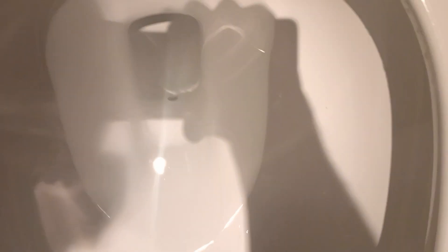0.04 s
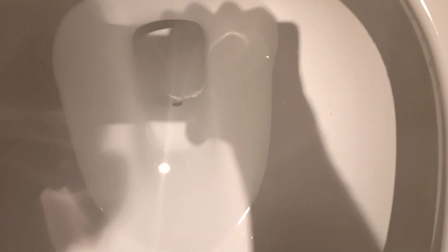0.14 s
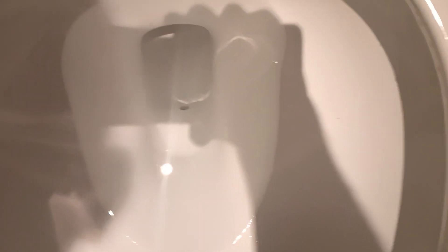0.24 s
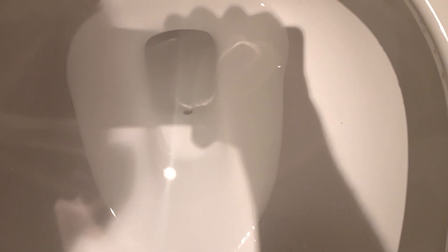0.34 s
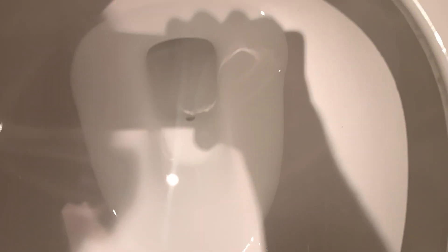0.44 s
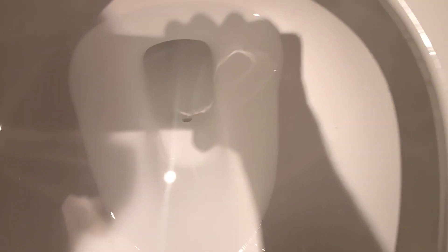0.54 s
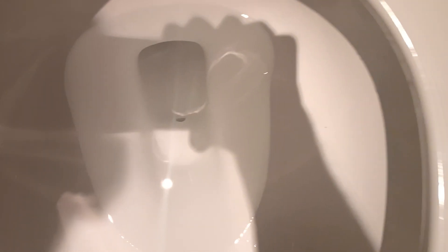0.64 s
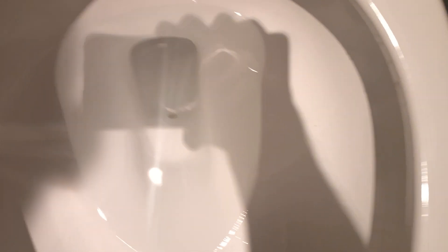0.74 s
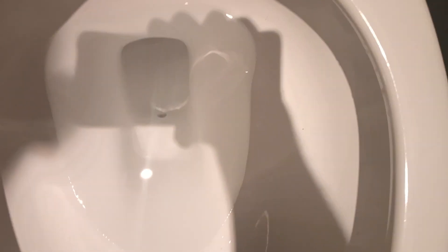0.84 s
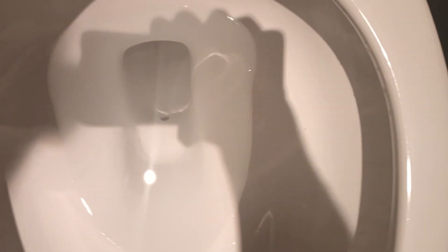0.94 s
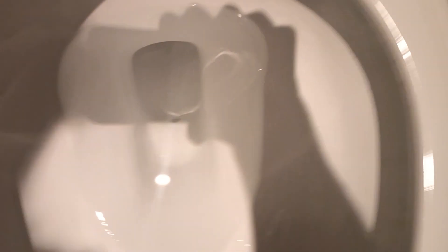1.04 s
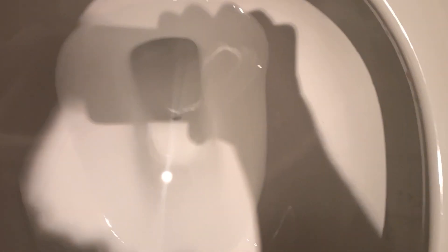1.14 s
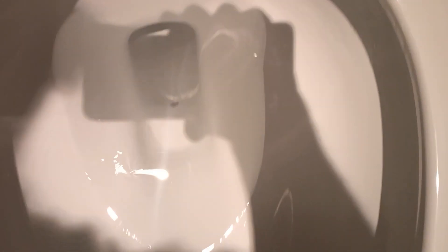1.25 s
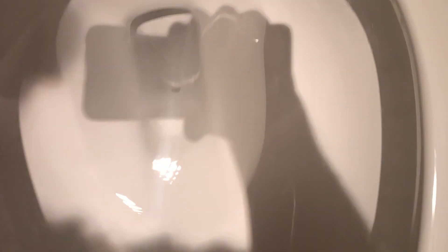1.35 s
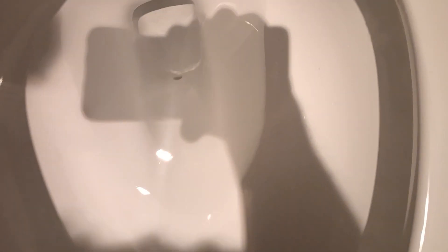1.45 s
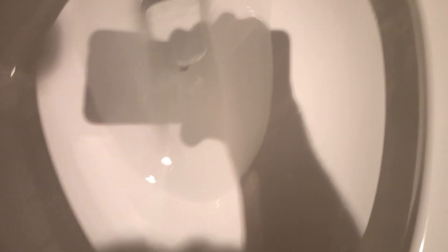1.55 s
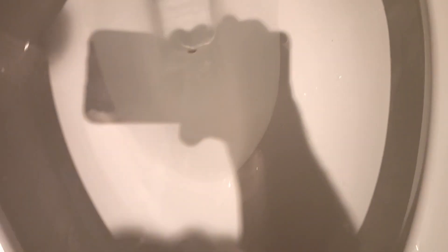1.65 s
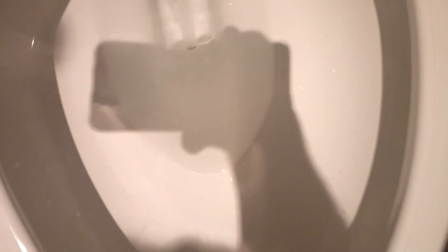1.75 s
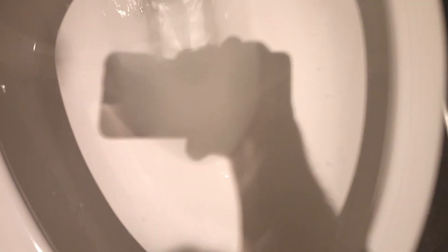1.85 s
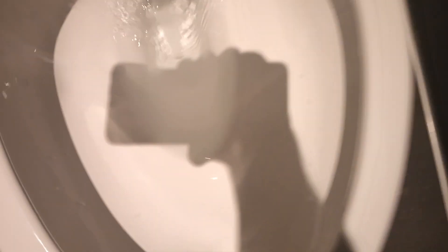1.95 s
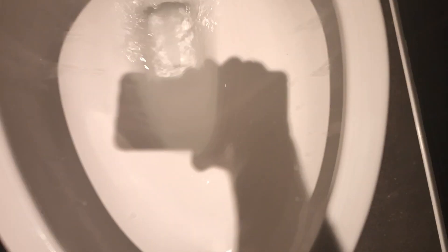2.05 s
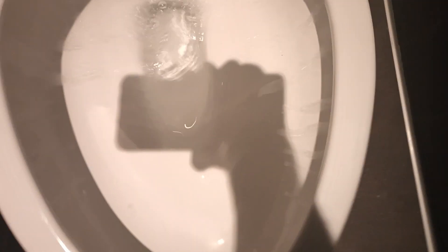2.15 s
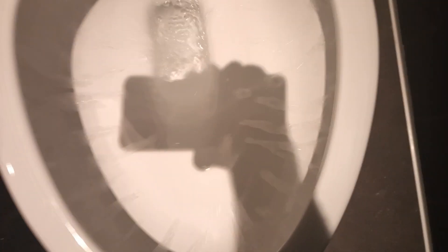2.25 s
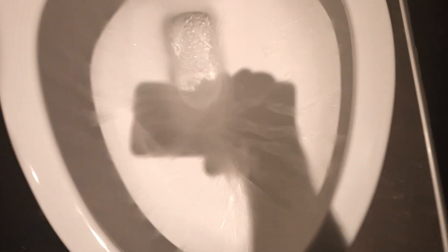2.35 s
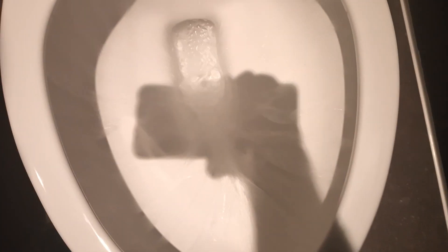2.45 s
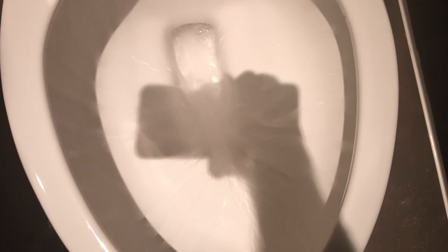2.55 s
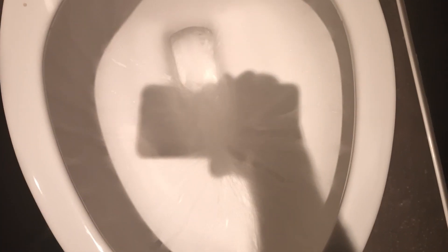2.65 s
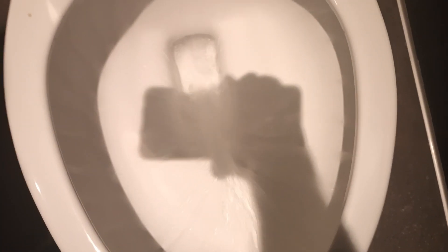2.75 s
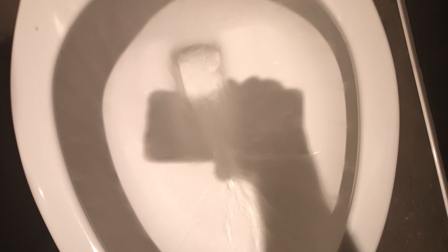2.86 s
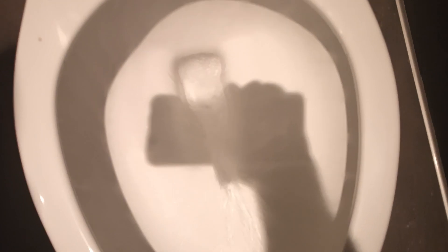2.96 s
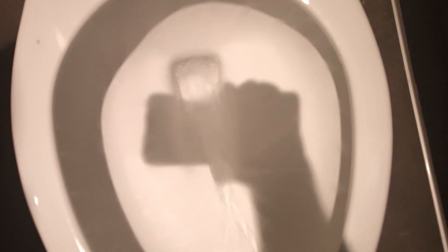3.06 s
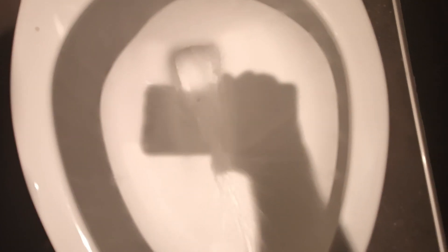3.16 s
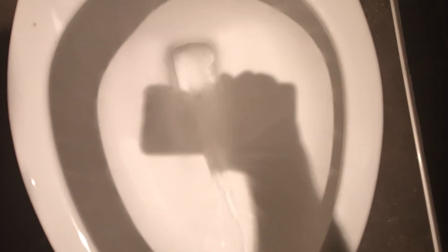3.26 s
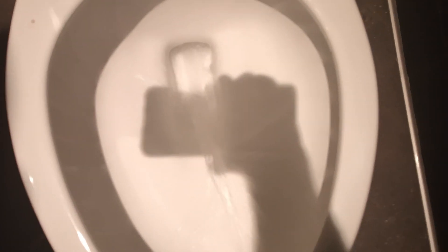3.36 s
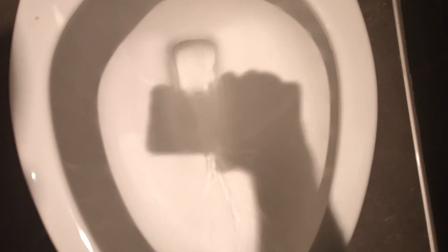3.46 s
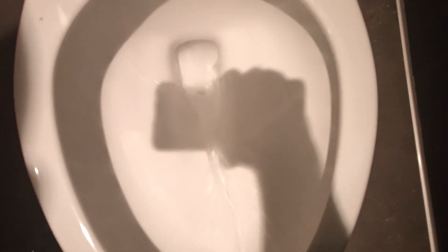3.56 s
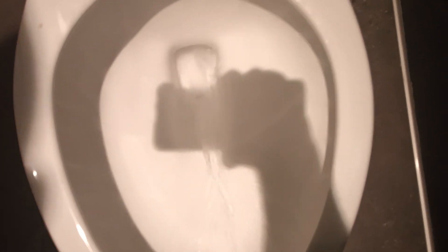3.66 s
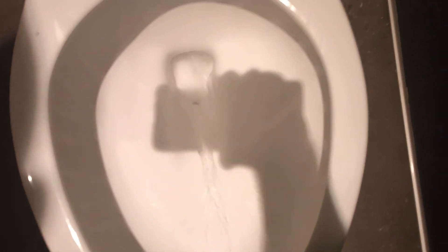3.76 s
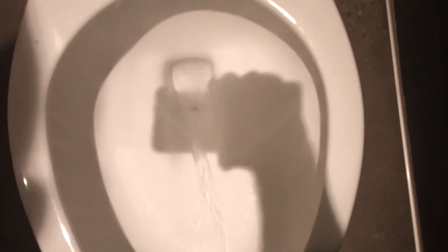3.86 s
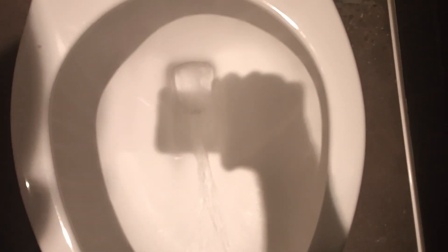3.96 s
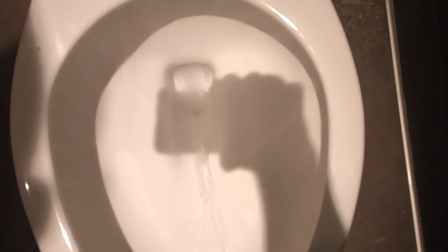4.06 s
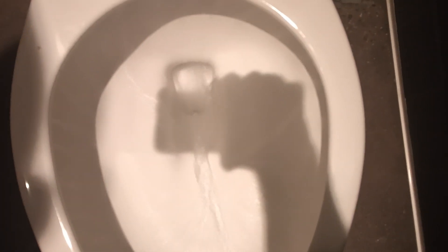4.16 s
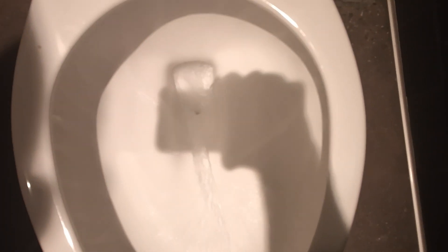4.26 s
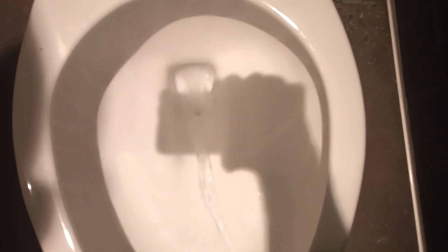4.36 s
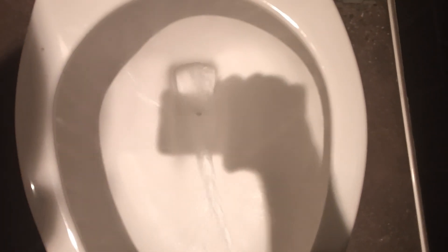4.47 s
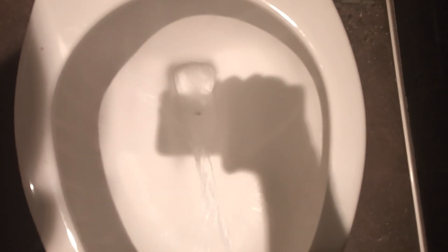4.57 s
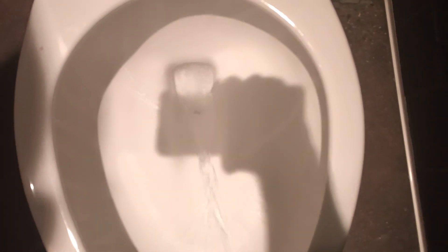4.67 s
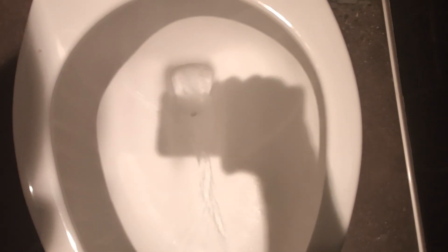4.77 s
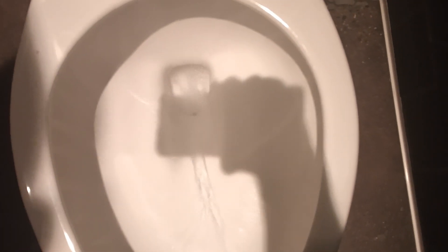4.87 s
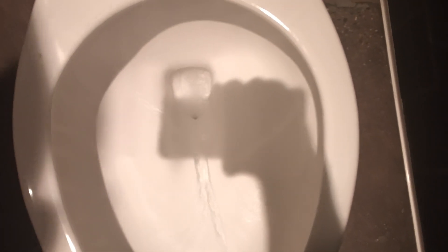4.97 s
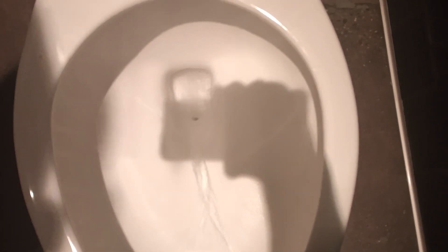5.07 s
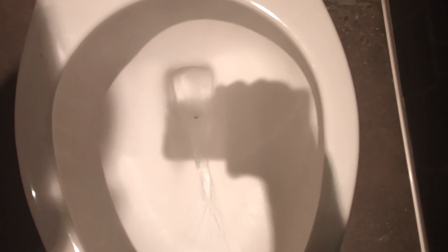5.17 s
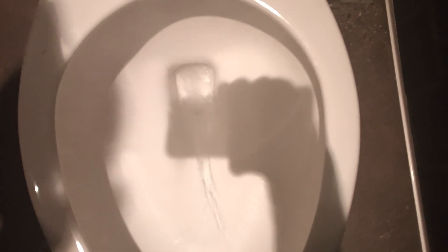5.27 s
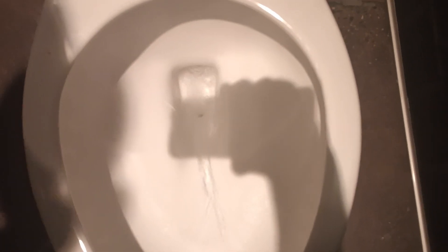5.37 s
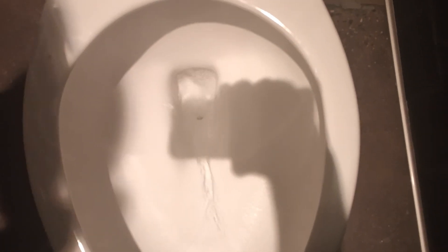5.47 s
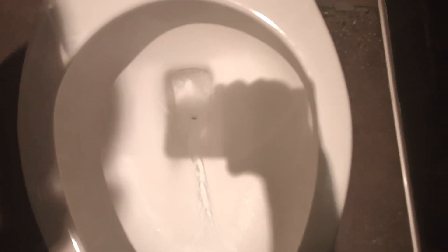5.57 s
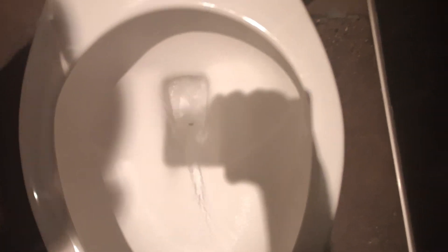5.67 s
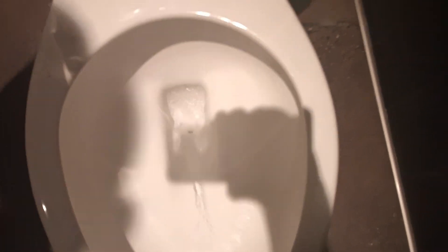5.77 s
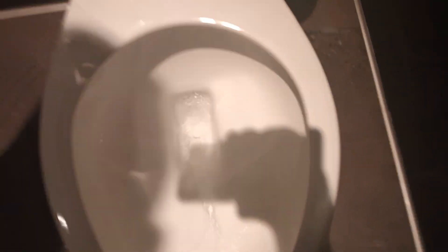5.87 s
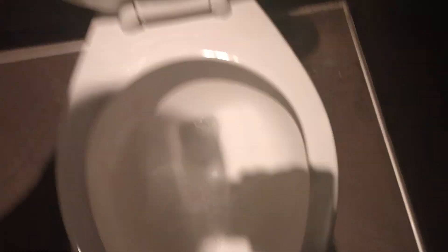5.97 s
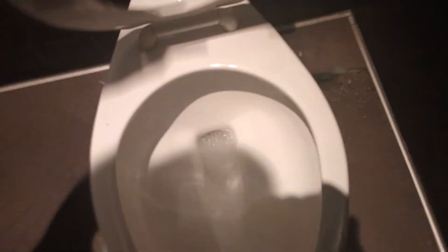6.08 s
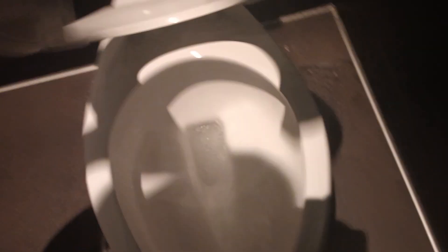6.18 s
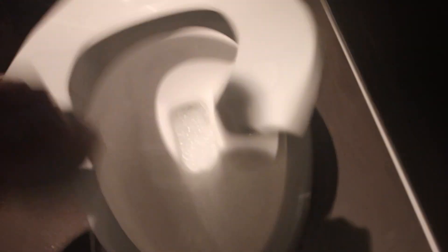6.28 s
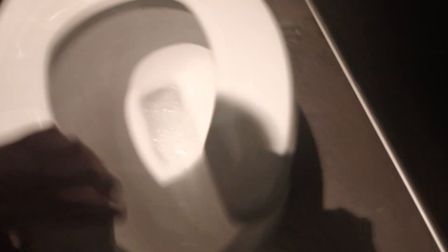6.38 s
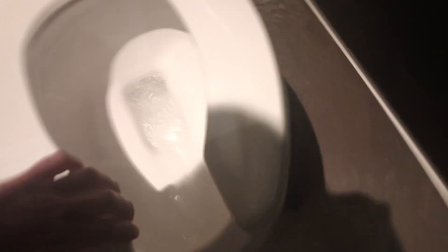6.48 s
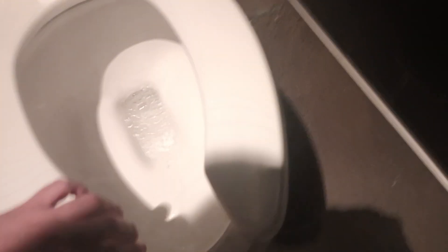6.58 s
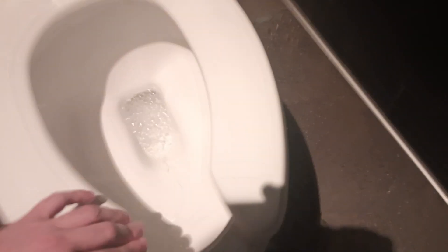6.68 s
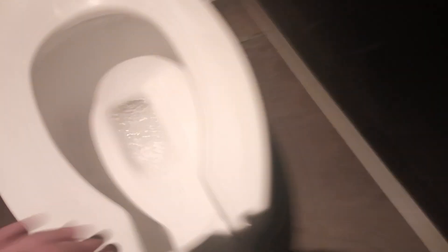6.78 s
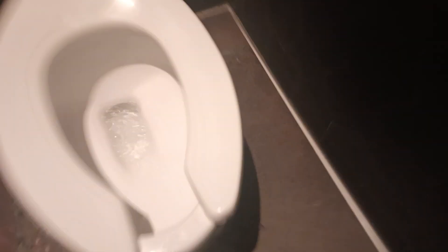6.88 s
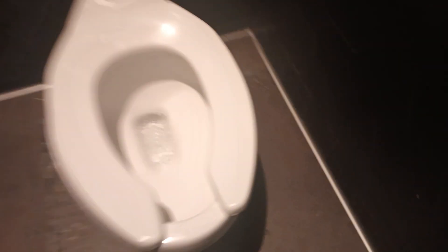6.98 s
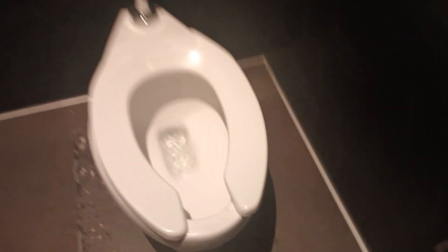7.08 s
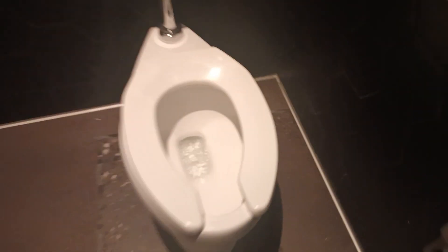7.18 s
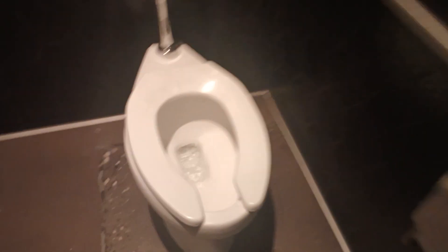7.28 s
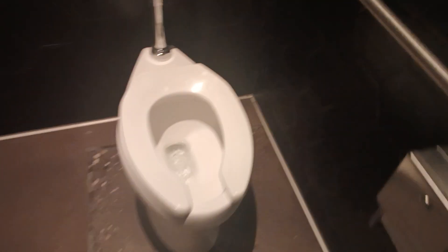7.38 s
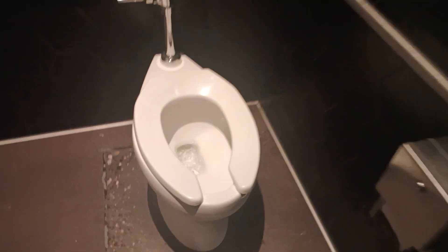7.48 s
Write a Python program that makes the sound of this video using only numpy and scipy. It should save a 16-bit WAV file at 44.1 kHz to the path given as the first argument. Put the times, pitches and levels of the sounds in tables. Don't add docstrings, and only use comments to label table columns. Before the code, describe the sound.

From 0 to 1.1 s it is quiet: a low unsteady fan hum, distant building hush, faint cloth brushes and hand rumble, very close. At 1.13 s a toilet valve snaps open with a thin squirt and hiss; deep hollow glugs quicken, and from about 1.45 to 1.9 s the flush is loudest, boiling, gurgling and spraying. Around 2 s it eases, then splashes up again near 2.3 s as the bowl drains, with plops at 2.5-2.7 s and a brighter spray surge at 2.7-3.4 s. From 3.5 to 6 s a thinner stream fizzes, drips and tinkles, steadily fading. Handling bumps and small ticks come at 6.36-6.7 s. At 6.74 s the plastic seat slams in a quick double crack, ringing through the tiled room. The ring is shut down abruptly around 7.2 s; a soft foot thud falls at 7.29 s, leaving faint pipe hiss until 7.5 s.

```python
import sys
import numpy as np
from scipy import signal
from scipy.fft import rfft, irfft, next_fast_len
from scipy.io import wavfile
from scipy.ndimage import uniform_filter1d, map_coordinates

SR = 44100
rng = np.random.default_rng(int(sys.argv[2]) if len(sys.argv) > 2 else 0)


def dump(signal):
    limited = np.clip(np.atleast_2d(signal).T, -1, 1)
    pcm = np.round(limited * 32767).astype(np.int16)
    wavfile.write(sys.argv[1], SR, pcm)


def convert_level_to_amplitude(level_db):
    exponent = np.asarray(level_db, float) / 20
    return 10 ** exponent


N = 332514

# f/Hz, width/Hz, lift/dB
BOWL = [(238, 20, 7), (292, 15, 8), (320, 15, 7), (466, 20, 5), (605, 30, 6), (665, 30, 6), (890, 30, 6),
        (975, 40, 6), (1075, 50, 5), (1290, 40, 4), (1450, 45, 6), (1800, 120, 4), (2175, 110, 10),
        (2460, 280, 5.5), (4130, 200, 5), (4820, 120, 4)]
# f/Hz, level/dB
MIST = [(2500, -71), (4410, -27), (7500, -3), (8160, -7), (13800, -14.5), (14050, -7.5), (15800, -4.5)]
# f/Hz, level/dB
SPRAY = [(1500, -55), (3000, -5.5), (4000, -0.5), (6000, 3), (6900, -1.5), (7800, -16), (10100, -50),
         (17200, -120)]
# t/s, flow/dB, muffling/dB
JET = [(1.14, -48.5, -2), (1.43, -47, 1.5), (1.53, -49, -11), (1.57, -29, 7.5), (1.69, -41, 12),
       (1.82, -38.5, 2.5), (2.18, -29.5, 6), (2.33, -25, 10.5), (2.39, -29.5, 15), (2.62, -33, 15),
       (2.69, -31, -2.5), (2.81, -26.5, 0.5), (3.35, -27.5, 2.5), (3.51, -33, 0.5), (5.19, -34, 0),
       (5.98, -37.5, 5), (6.34, -52, 7), (6.75, -65.5, 8)]
# t/s, level/dB
DRAIN = [(1.14, -53), (1.16, -53), (1.2, -45), (1.27, -40.5), (1.43, -34), (1.47, -22), (1.64, -15.5),
         (1.87, -24), (2.48, -28.5), (2.64, -25), (2.8, -30), (3.19, -29), (3.36, -36), (4.06, -38),
         (5.73, -42), (6.14, -48), (6.55, -58.5), (6.65, -88)]


def unit(x):
    return x / np.sqrt(np.mean(x ** 2) + 1e-20)


def along(points, hz):
    f, v = np.transpose(points)
    return np.interp(np.log(hz + 1), np.log(f + 1), v)


def curves(rows):
    s, *cols = np.transpose(rows)
    return [np.interp(np.arange(N) / SR, s, c) for c in cols]


def wobble(rate):
    knots = rng.standard_normal(int(N * rate / SR) + 4)
    return map_coordinates(knots, [np.arange(N) * rate / SR])


def swells(rows, rise_s, fall_s):
    t = np.arange(N) / SR
    return sum(size * np.exp(np.where(t < s, -((t - s) / rise_s) ** 2, (s - t) / fall_s)) for s, size in rows)


def db_swells(rows, rise_s, fall_s):
    return swells([(s, convert_level_to_amplitude(db)) for s, db in rows], rise_s, fall_s)


def filtered(x, response):
    m = next_fast_len(N + SR // 2)
    return irfft(rfft(x, m) * response(np.fft.rfftfreq(m, 1 / SR)), m)[..., :N]


def causal(spectrum):
    c = irfft(np.log(convert_level_to_amplitude(along(spectrum, np.fft.rfftfreq(4096, 1 / SR))) + 1e-4))
    c[1:2048] *= 2
    c[2049:] = 0
    h = irfft(np.exp(rfft(c)))
    return h / np.linalg.norm(h)


def bowl(hz, modes=BOWL):
    return convert_level_to_amplitude(sum(db / (1 + (2 * (hz - c) / w) ** 2) for c, w, db in modes))


def coloured(points):
    return lambda hz: convert_level_to_amplitude(along(points, hz))


def in_bowl(points):
    return lambda hz: convert_level_to_amplitude(along(points, hz)) * bowl(hz)


def spread(pair, gain):
    # f/Hz, correlation
    likeness = [(100, 0.97), (400, 0.95), (600, 0.4), (1000, 0.42), (4000, 0.32), (12000, 0.15)]

    def turn(hz):
        return np.arccos(np.clip(along(likeness, hz), -1, 1)) / 2

    mid, side = filtered(pair, lambda hz: gain(hz) * [np.cos(turn(hz)), np.sin(turn(hz))])
    return np.array([mid + side, mid - side])


def rush(gain, patchy_db, grain_db=0, count=1):
    drops_start = [1.55, 1.9]
    z = signal.stft(rng.standard_normal((2, N)), nperseg=512)[2]
    field = uniform_filter1d(rng.standard_normal(z.shape[1:]), size=5, axis=0)
    field = uniform_filter1d(field, size=8, axis=1)
    pair = signal.istft(z * convert_level_to_amplitude(patchy_db * unit(field)), nperseg=512)[1][:, :N]
    when, size = rng.random((count, 2)).T
    bursts = np.bincount((when * N).astype(int), convert_level_to_amplitude(-grain_db * np.log(size + 0.046)), N)
    lift = signal.lfilter([1], [1, -.985], bursts)
    lift *= np.interp(np.arange(N) / SR, drops_start, [0, 1])
    out = spread(pair * (1 + 0.52 * lift), gain)
    return out / np.std(out.mean(0))


def clicks(rows, gain, t60):
    out, t = np.zeros((2, N + SR)), np.arange(SR // 20) / SR
    for s, db in rows:
        burst = convert_level_to_amplitude(db - 60 * t / t60) * rng.standard_normal((2, len(t)))
        out[:, round(s * SR):][:, :len(t)] += burst
    return filtered(out[:, :N], gain)


def bubbles(rows, rise, attack, rough, edge, over_db=-40):
    out = np.zeros(N + SR)
    for s, db, hz, life in rows:
        t = np.arange(int(3.2 * life * SR)) / SR
        jitter = rng.standard_normal(size=6000)
        shape = np.exp(-(t / life) ** edge) * (1 - np.exp(-t / attack))
        phase = 2 * np.pi * hz * (t + rise * t * t / life)
        phase += rough * np.cumsum(np.resize(jitter, len(t)))
        overtones = sum(np.sin(k * phase) for k in (2, 3, 4))
        out[round(s * SR):][:len(t)] += convert_level_to_amplitude(db) * shape * (np.sin(phase) + convert_level_to_amplitude(over_db) * overtones)
    return filtered(out[:N], lambda f: f ** 8 / (f ** 8 + 195 ** 8))


def lived(rows, life_s):
    s, db, hz = np.transpose(rows)
    return np.transpose([s, db, hz, life_s * np.exp(.02 * (db.mean() - db))])


def tiles(x, scale):
    # f/Hz, t60/s
    decay = [(250, 1.64), (1000, 1.33), (3800, 1.4), (4500, 0.82), (6500, 0.74), (8000, 0.41),
             (10000, 0.29)]
    hz, t, z = signal.stft(rng.standard_normal((2, SR)), SR, nperseg=256)
    fade = convert_level_to_amplitude(-60 * t / (scale * along(decay, hz))[:, None])
    tail = signal.istft(z * fade, SR, nperseg=256)[1]
    wet = signal.fftconvolve(x[None], tail / np.linalg.norm(tail[0]), axes=1)[:, :N]
    return spread(wet, np.ones_like)


def walls(x, echo_db, count):
    delay_s, size = .002 + .03 * rng.random((count, 2)), rng.standard_normal((count, 2))
    size = size / np.linalg.norm(size, axis=0) * convert_level_to_amplitude(echo_db)
    h = np.zeros((2, SR // 10))
    np.add.at(h, (np.arange(2)[None], (delay_s * SR).astype(int)), size)
    echoes = rfft(h, next_fast_len(N + SR // 2))

    def comb(hz):
        above = hz ** 6 / (hz ** 6 + 500 ** 6)
        return (1 + echoes * above) / np.sqrt(1 + convert_level_to_amplitude(2 * echo_db) * above ** 2)

    return filtered(x, comb)


def building():
    # f/Hz, level/dB
    hush_colour = [(94, -60), (160, -3), (521, -16), (576, -10.5), (636, -16.5), (1000, -18), (1300, -57),
                   (2200, -120)]
    # f/Hz, level/dB
    hiss_colour = [(590, -41), (1000, -9), (1160, -7), (1260, -19), (1330, -7.5), (3910, -19.5),
                   (4090, -26), (5920, -24.5), (8280, -44), (13800, -51), (14600, -34), (15800, -35)]
    wander_db = .8 * wobble(3.2)
    low = convert_level_to_amplitude(-58.5 + wander_db) * rush(in_bowl(hush_colour), patchy_db=3.0)
    high = convert_level_to_amplitude(-66 + wander_db) * rush(coloured(hiss_colour), patchy_db=1.2)
    return low + high


def refill_pipe():
    fade_in = [7.15, 7.19]
    shown = np.interp(np.arange(N) / SR, fade_in, [0, 1])
    return convert_level_to_amplitude(-73) * shown * rush(coloured(MIST), patchy_db=4.0)


def fan():
    # f/Hz, wander/Hz, level/dB
    blade_tone = (98, 2.96, -52)
    hz, wander_hz, db = blade_tone
    tone = np.sin(2 * np.pi * np.cumsum(hz + wander_hz * wobble(14)) / SR)
    duck_db = np.interp(np.arange(N) / SR, [.85, 1.1, 6.6, 7.1], [1.0, -5.5, -9.5, -34])
    return convert_level_to_amplitude(db + 1.2 * wobble(12) + duck_db) * tone


def handling():
    # t/s, level/dB
    bumps = [(0.01, -57), (.95, -41), (1.3, -38), (1.43, -40), (1.65, -65), (2.01, -53), (2.698, -49),
             (4.05, -49), (4.96, -43), (5.28, -45), (5.4, -48), (5.9, -57), (6.359, -37), (6.59, -49),
             (7.31, -68)]
    # f/Hz, level/dB
    rumble_colour = [(13, -54), (22, -16), (27, -38), (48, -3.5), (86, -0.5), (156, -11), (170, -11),
                     (220, -31), (370, -120)]
    hand = convert_level_to_amplitude(-57) + db_swells(bumps, rise_s=0.078, fall_s=0.085)
    return hand * convert_level_to_amplitude(-5.5 + 0.86 * wobble(25)) * rush(coloured(rumble_colour), patchy_db=3.5)


def rustles():
    # t/s, level/dB, f/Hz, width/Hz
    brushes = [
        (.03, -67, 2660, 500),
        (.1, -70, 3200, 250),
        (0.59, -70, 3900, 120),
        (.6, -73, 4500, 900),
        (0.75, -67, 1600, 500),
        (0.77, -77, 4400, 500),
        (.92, -78, 15100, 1200),
        (1.05, -75, 6300, 600),
        (1.26, -66, 9100, 500),
        (1.25, -66, 11200, 600),
    ]
    noise = rng.standard_normal((2, N))
    out = np.zeros((2, N))
    for s, db, hz, width in brushes:
        band = filtered(noise, lambda f: 1 / (1 + (2 * (f - hz) / width) ** 4))
        out += db_swells([(s, db)], rise_s=0.078, fall_s=0.14) * unit(band)
    return out


def finger_ticks():
    # t/s, level/dB
    ticks = [
        (0.695, -82),
        (0.9288, -67),
        (6.3664, -58),
        (6.3894, -58),
        (6.5306, -49.5),
        (6.6662, -69),
        (6.6952, -61),
        (6.8922, -66),
        (7.1057, -68),
    ]
    # f/Hz, level/dB
    shell_colour = [(3000, -27), (7500, -3), (10500, 6), (12500, -10), (15500, -1.5)]
    return convert_level_to_amplitude(5.5) * clicks(ticks, coloured(shell_colour), t60=0.046)


def seat():
    # t/s, level/dB
    blows = [
        (6.7436, -13),
        (6.747, -6),
        (7.292, -22),
    ]
    # f/Hz, level/dB, t60/s
    plastic = [(280, -19, 1.2), (533, -31, .9), (646, -28, 1.2), (915, -28, .8), (985, -22, 2.4),
               (1288, -17, 1.5), (1301, -24, 2), (2169, -30, 1), (2379, -28, 3), (1884, -32, 1.2),
               (3036, -33, 1.1), (3289, -28, 1.2), (3435, -31, 1.2), (3661, -30, 1.3)]
    # f/Hz, level/dB
    slam_colour = [(120, -50), (200, -16), (270, -3), (460, -30.5), (580, -8.5), (1250, -2.5), (1450, -9.5),
                   (2000, -14.5), (2250, -8.5), (2600, -16), (3600, -13), (4200, -27), (6500, -32),
                   (7300, -49.5), (16000, -68)]
    # f/Hz, level/dB
    foot_colour = [(59, -48), (100, -27), (210, 1.5), (497, -7.5), (608, 1), (1190, -37), (1290, -29),
                   (2500, -23), (3250, -54), (5500, -120)]
    # t/s, level/dB
    gate = [
        (6.75, -0.5),
        (6.9, -1.5),
        (7.05, 0.5),
        (7.163, 2.5),
        (7.175, -4.5),
        (7.21, -5.5),
        (7.228, -12),
        (7.54, -12.5),
    ]
    t = np.arange(SR) / SR
    near, room_feed, foot = np.zeros((3, N + SR))
    slam = causal(slam_colour)
    for s, db in blows[:2]:
        start = round(s * SR)
        crack = signal.fftconvolve(convert_level_to_amplitude(-60 * t / 0.036) * rng.standard_normal(SR), slam)[:SR]
        ring = np.zeros(SR)
        for hz, level_db, t60 in plastic:
            beat_db = 4 * wobble(40)[:SR]
            phase = 2 * np.pi * hz * t + np.cumsum(rng.normal(0, .035, SR))
            ring += convert_level_to_amplitude(level_db - 60 * t / t60 + beat_db) * np.sin(phase)
        ring = signal.lfilter(*signal.butter(2, 4300 / SR * 2), ring)
        near[start:][:SR] += convert_level_to_amplitude(db) * (convert_level_to_amplitude(2.0) * crack + ring)
        near[start:][:4096] += convert_level_to_amplitude(db + 11.0) * slam
        room_feed[start:][:4096] += convert_level_to_amplitude(db) * slam
    near = signal.lfilter(*signal.butter(2, 200 / SR * 2, "high"), near)
    s, db = blows[2]
    push = (1 - np.exp(-t / 0.012)) * convert_level_to_amplitude(-60 * t / 0.17) * rng.standard_normal(SR)
    foot[round(s * SR):][:SR] = convert_level_to_amplitude(db - 3.5) * signal.fftconvolve(push, causal(foot_colour))[:SR]
    ring_out = (near[:N] + convert_level_to_amplitude(20.0) * tiles(room_feed[:N], scale=1.03)) * convert_level_to_amplitude(curves(gate)[0])
    return ring_out + foot[:N] + convert_level_to_amplitude(-6.5) * tiles(foot[:N], scale=0.45)


def drops():
    # t/s, level/dB
    spits = [(1.8161, -5.5), (1.8899, -14), (1.9433, -7.5), (1.9577, -6), (2.082, -25), (2.1832, -15),
             (2.3159, -19), (2.615, -19), (2.636, -11), (2.6537, -31), (2.6706, -20), (2.6901, -20),
             (3.0922, -14), (3.184, -20), (3.7113, -25), (3.8639, -23.5), (4.1612, -26), (4.5444, -22),
             (5.1425, -15), (5.2403, -24)]
    # t/s, level/dB
    sparks = [(1.141, -30), (1.3718, -44), (1.4576, -36), (2.6926, -22), (2.8393, -20), (3.2164, -15),
              (3.3137, -32), (3.4788, -26), (3.6569, -29), (3.7632, -28), (3.9084, -29), (4.0715, -29),
              (4.2401, -28), (4.3424, -32), (4.5394, -30), (5.183, -30), (5.2498, -33), (5.6833, -32)]

    def spit_colour(hz):
        return np.maximum(convert_level_to_amplitude(along(SPRAY, hz)), convert_level_to_amplitude(along(MIST, hz) - 5))

    return convert_level_to_amplitude(-5.5) * clicks(spits, spit_colour, t60=0.0078) + convert_level_to_amplitude(5.0) * clicks(sparks, coloured(MIST), t60=0.012)


def fizz(count):
    when, pick, detune, size = rng.random((count, 4)).T
    s = 1.6 + 4.6 * when
    hz = np.array(BOWL)[(6 + pick * 8).astype(int), 0] * (.97 + .06 * detune)
    db = np.interp(s, *np.transpose(JET)[:2]) - 9 + 7 * size
    rows = np.transpose([s, db, hz, 0.013 + 0.014 * detune])
    return bubbles(rows, rise=0.008, attack=0.0056, rough=0.081, edge=0.8)


def small_bubbles():
    # t/s, level/dB, f/Hz
    plops = [(2.563, -10, 606), (2.59, -14.5, 647), (2.625, -18, 562), (2.68, -22, 622), (2.7, -25, 760),
             (2.503, -18, 525), (2.605, -15, 974), (2.715, -20.5, 907), (2.62, -15, 901),
             (2.64, -11.5, 878), (2.66, -26, 948), (2.933, -18, 884), (3.004, -23.5, 896),
             (3.241, -16.5, 1009), (3.617, -25.5, 884), (4.122, -34, 613), (4.149, -26.5, 902),
             (4.236, -28, 994), (4.301, -24, 912), (4.578, -35, 600), (5.02, -24.5, 815), (5.266, -32, 600),
             (5.432, -33, 588), (5.594, -34.5, 900), (5.633, -28, 774), (5.665, -28.5, 577)]
    # t/s, level/dB, f/Hz
    tinkles = [(2.8112, -17, 2350), (2.9189, -22, 2200), (3.0536, -20, 2080), (3.1125, -25, 2150),
               (3.1586, -21, 2510), (3.2647, -23, 2310), (3.3814, -23, 2200), (3.6952, -33, 2210),
               (3.8473, -20, 2146), (4.2345, -26.5, 2340), (4.2774, -19, 2300), (4.3208, -18, 2130),
               (4.3992, -19, 2440), (4.637, -19.5, 2230), (4.7448, -28, 2400), (4.7862, -18, 2144),
               (4.9289, -23, 2240), (4.988, -33, 2430), (5.3255, -31, 2580), (5.3779, -22, 2180),
               (5.4158, -17, 2135), (5.498, -25, 2510), (5.7201, -24, 2225), (5.786, -31, 2360),
               (5.9301, -34, 2390), (5.9989, -40, 2410)]
    # t/s, level/dB, f/Hz, life/s
    stirs = [(.03, -51, 493, .08), (.05, -60.5, 860, 0.16), (.25, -64, 1240, .1), (.4, -63, 1220, .06),
             (.4, -56, 600, .07), (.3, -62, 860, .15), (.28, -48, 621, 0.11), (.5, -43, 221, 0.055),
             (.57, -53.5, 411, 0.064), (.66, -65, 1700, .05), (6.535, -39, 894, .035),
             (6.6, -54, 1195, .14), (5.91, -46, 1440, .04), (5.97, -45, 1450, .04), (6.01, -46, 1330, .03)]
    # t/s, level/dB, f/Hz, life/s
    glints = [
        (1.59, -27, 1629, 0.045),
        (1.565, -34, 2780, .05),
        (2.089, -25, 4080, 0.045),
        (3.155, -21, 2500, .015),
        (5.141, -28, 4780, 0.035),
        (4.41, -33, 4170, .06),
        (4.66, -33, 4100, .04),
        (3.88, -35, 4150, .05),
        (5.12, -35, 4050, .05),
    ]
    out = convert_level_to_amplitude(-2.5) * bubbles(lived(plops, 0.028), rise=-0.012, attack=0.00078, rough=0.054, edge=1.25)
    out += bubbles(list(stirs) + list(glints), rise=0.0043, attack=0.0031, rough=0.046, edge=1.55)
    out += convert_level_to_amplitude(-8) * bubbles(lived(tinkles, 0.021), rise=0.0051, attack=0.0021, rough=0.062, edge=1.3)
    return out + fizz(count=260)


def churned_pockets():
    # t/s, level/dB, f/Hz
    boils = [(1.474, -14.5, 413), (1.506, -20, 450), (1.562, -10.5, 613), (1.64, -7.5, 459),
             (1.725, -13, 647), (1.759, -6, 654), (1.835, -17, 641), (1.891, -27, 503), (1.922, -27, 680),
             (2.122, -23, 608), (2.218, -21, 601), (2.307, -25, 624), (2.381, -22, 538), (2.828, -24, 593)]
    # t/s, level/dB, f/Hz
    seethes = [(1.146, -32, 888), (1.264, -33, 1288), (1.324, -27.5, 979), (1.456, -23, 864),
               (1.572, -15, 841), (1.627, -17, 929), (1.661, -18, 940), (1.725, -21, 940),
               (1.763, -25.5, 870), (1.907, -23.5, 945), (2.0, -20, 946), (2.036, -21, 882),
               (2.127, -21.5, 899), (2.187, -21.5, 880), (2.296, -34, 999), (2.328, -29, 914),
               (2.366, -24, 890), (2.416, -19.5, 891), (2.495, -18, 1003), (3.049, -33, 940),
               (3.097, -20.5, 1130), (3.178, -24, 988), (3.21, -17.5, 973), (3.327, -27.5, 1115),
               (3.401, -28.5, 995), (3.461, -28, 995)]
    mid = bubbles(lived(boils, 0.026), rise=0.012, attack=0.0026, rough=0.044, edge=2.7)
    mid += bubbles(lived(seethes, 0.042), rise=0.011, attack=0.0031, rough=0.052, edge=1.7)
    return filtered(convert_level_to_amplitude(-4.5) * mid, lambda hz: 1 / (1 + (hz / 1500) ** 12))


def trap_pockets():
    # t/s, level/dB, f/Hz
    glugs = [(1.125, -26.5, 226), (1.146, -21, 231), (1.254, -22, 303), (1.273, -24, 292),
             (1.302, -13, 249), (1.329, -12.5, 329), (1.356, -10, 307), (1.367, -18, 248),
             (1.458, -4.5, 319.5), (1.484, -6.5, 291), (1.509, -6.5, 351), (1.557, -2.5, 290),
             (1.593, -3, 277), (1.624, -7, 299), (1.666, -9, 300), (1.699, -9.5, 238), (1.759, -18, 298),
             (1.804, -21, 300), (1.865, -8, 253)]
    # t/s, level/dB, f/Hz
    gulps = [(1.974, -16.5, 250), (2.066, -24, 256), (2.098, -26, 240), (2.363, -33, 317),
             (2.462, -37, 326), (6.02, -45, 306), (4.103, -38, 236), (4.347, -35.5, 241.5),
             (5.893, -35.5, 273), (6.19, -37, 277), (6.665, -44, 256), (6.71, -36, 265)]
    deep = bubbles(lived(glugs, 0.027), rise=0.039, attack=0.0058, rough=0.014, edge=5.2, over_db=-30.0)
    deep = filtered(convert_level_to_amplitude(-3.5) * deep, lambda hz: 1 / (1 + (hz / 1450) ** 12))
    late = bubbles(lived(gulps, 0.027), rise=0.011, attack=0.0036, rough=0.011, edge=1.5)
    return deep + convert_level_to_amplitude(3.5) * late


def pockets():
    ringing = trap_pockets() + small_bubbles() + churned_pockets()
    return ringing + convert_level_to_amplitude(-5.5) * tiles(ringing, scale=0.28) + drops()


def trap_gurgle():
    # t/s, level/dB
    heaves = [(1.23, -41), (1.38, -14.5), (1.46, -10), (1.87, -15), (1.96, -26), (2.04, -26.5), (2.16, -20),
              (2.92, -31), (3.24, -32), (4.06, -59), (4.36, -43), (5.902, -30), (6.19, -59), (6.55, -52),
              (6.72, -44)]
    # f/Hz, level/dB
    trap_colour = [(71, -80), (120, -43.5), (200, -6), (231, -1), (297, -2.5), (430, -8.5), (463, -11),
                   (517, -8.5), (650, -38), (700, -14), (910, -35), (1540, -120)]
    t = np.arange(N) / SR
    swallow_s, hold_s, seep_db = 1.26, 0.62, -44.5
    suck_db = -20 - 30 * np.clip((swallow_s - t) / 0.035, 0, 1)
    suck_db -= 23 * np.maximum(t - swallow_s - hold_s, 0)
    seep = convert_level_to_amplitude(seep_db + 0.16 * (curves(DRAIN)[0] - seep_db))
    glug = convert_level_to_amplitude(suck_db) + seep + db_swells(heaves, rise_s=0.016, fall_s=0.029)
    return glug * convert_level_to_amplitude(-7.0 + 2.8 * wobble(18)) * rush(in_bowl(trap_colour), patchy_db=1.5)


def outlet_churn(surge):
    # f/Hz, level/dB
    full_colour = [(250, -33), (420, -11), (465, -5.5), (788, -3), (955, -9), (1320, -10.5), (1400, -23),
                   (1820, -31), (3080, -120)]
    # f/Hz, level/dB
    drained_colour = [(250, -56), (420, -25.5), (589, -8.5), (731, -11.5), (872, -7), (1400, -8.5),
                      (1820, -22), (3080, -120)]
    drained = np.interp(np.arange(N) / SR, [2.0, 2.9], [0, np.pi / 2])
    churn = np.cos(drained) * rush(in_bowl(full_colour), patchy_db=2.5)
    churn = churn + np.sin(drained) * rush(in_bowl(drained_colour), patchy_db=3.0)
    return churn * convert_level_to_amplitude(curves(DRAIN)[0] - 4.0 + .5 * surge + 1.33 * wobble(14))


def jet_splash(surge, flow_db, cover_db, spurt_db):
    # f/Hz, level/dB
    splash_colour = [(760, -16), (1300, -12.5), (1430, -2), (1970, -0.5), (2170, -3.5), (2600, -0.5),
                     (2760, -4.5), (3000, 0), (4000, -4), (5200, -11.5), (8800, -120)]
    # f/Hz, width/Hz, lift/dB
    brim_modes = [(1906, 77, 5), (2470, 200, -4), (2820, 80, 12), (3340, 210, 5), (3710, 300, 4)]
    brim_ends = [2.41, 2.52]
    splash = rush(in_bowl(splash_colour), patchy_db=2.0, grain_db=4.5, count=1000)
    brimming = np.interp(np.arange(N) / SR, brim_ends, [1, 0])
    splash += (filtered(splash, lambda hz: bowl(hz, brim_modes)) - splash) * brimming
    top = filtered(splash, lambda hz: hz ** 8 / (hz ** 8 + 4300 ** 8))
    squirt = db_swells([(1.146, -37.5)], rise_s=0.01, fall_s=0.11) * unit(top)
    dulled = splash - top * (1 - convert_level_to_amplitude(-0.36 * np.maximum(cover_db, 0)))
    shake = convert_level_to_amplitude(flow_db + 0.83 * spurt_db - 1.1 + .5 * surge + 0.26 * wobble(25))
    return shake * dulled + squirt


def jet_spray(surge, flow_db, cover_db, spurt_db):
    level = convert_level_to_amplitude(flow_db - cover_db + spurt_db + 1.0 + 0.47 * surge + 0.91 * wobble(25))
    return level * rush(in_bowl(SPRAY), patchy_db=2.0, grain_db=4.5, count=1200)


def jet_mist(surge, flow_db, cover_db, spurt_db):
    # t/s, level/dB, rise/s, fall/s
    valve_hiss = [
        (1.25, -59, .05, .5),
        (1.47, -41.5, .014, .11),
    ]
    hiss = sum(db_swells([(s, db)], rise_s, fall_s) for s, db, rise_s, fall_s in valve_hiss)
    fine = convert_level_to_amplitude(flow_db - 6 - 1.48 * cover_db + 0.4 * spurt_db) + hiss
    shake = convert_level_to_amplitude(3.0 + 0.26 * surge + 0.57 * wobble(27))
    return fine * shake * rush(in_bowl(MIST), patchy_db=.8, grain_db=5.0, count=1200)


def flush():
    # t/s, lift/dB
    spurts = [
        (1.143, 11),
        (1.615, 4),
        (1.655, 6),
        (1.882, 8),
        (1.957, 8),
        (3.185, 3),
    ]
    opened = np.clip((np.arange(N) / SR - 1.131) / 0.0052, 0, 1) ** 2
    surge = wobble(11)
    flow_db, cover_db = curves(JET)
    state = surge, flow_db, cover_db, swells(spurts, rise_s=0.0038, fall_s=0.037)
    jet = jet_splash(*state) + jet_spray(*state) + jet_mist(*state)
    return opened * (trap_gurgle() + outlet_churn(surge) + jet)


def scene():
    # t/s, side level/dB
    width = [
        (0, 6),
        (1.4, 1.5),
        (2.2, 2),
        (3.5, 0.5),
        (5.8, -0.5),
        (6.7, 5),
        (7.54, 4.5),
    ]
    room = building() + refill_pipe() + fan() + handling()
    near = walls(room + pockets() + flush(), echo_db=-9.5, count=14)
    near = near + walls(seat(), echo_db=-5.5, count=8)
    mid, side = near.mean(0), (near[0] - near[1]) / 2 * convert_level_to_amplitude(curves(width)[0])
    return np.array([mid + side, mid - side]) + rustles() + finger_ticks()


def low_pass(x):
    return signal.sosfilt(signal.butter(12, 17090, fs=SR, output="sos"), x)


def record(dry):
    # f/Hz, left minus right/dB
    sides = [(120, -0.5), (500, 1.1), (2500, -1), (4500, -1), (9000, 1)]
    x = dry / (1 + np.abs(dry / 1.05) ** 8) ** (1 / 8)
    half = np.array([[.5], [-.5]])

    def ports(hz):
        turn = 1.15 * np.sin(2 * np.pi * hz / 2600) * hz ** 8 / (hz ** 8 + 480 ** 8)
        band = (hz < 15760) * hz ** 4 / (hz ** 4 + 49.5 ** 4)
        return convert_level_to_amplitude(along(sides, hz) * half) * np.exp(1j * turn * half) * band

    return low_pass(filtered(x, ports))


dry = scene()
out = record(dry)
dump(out)
```